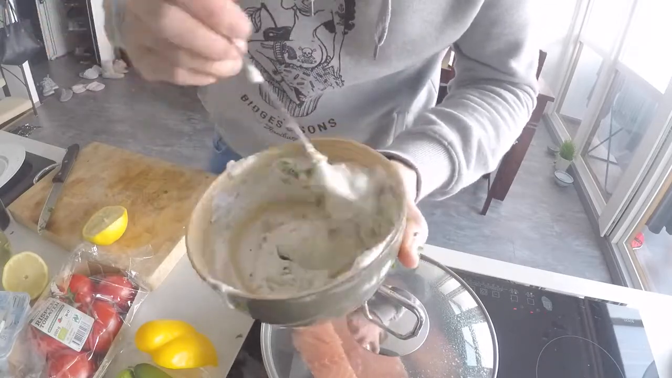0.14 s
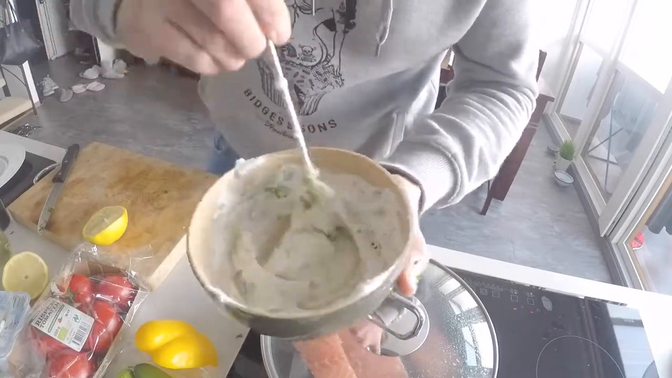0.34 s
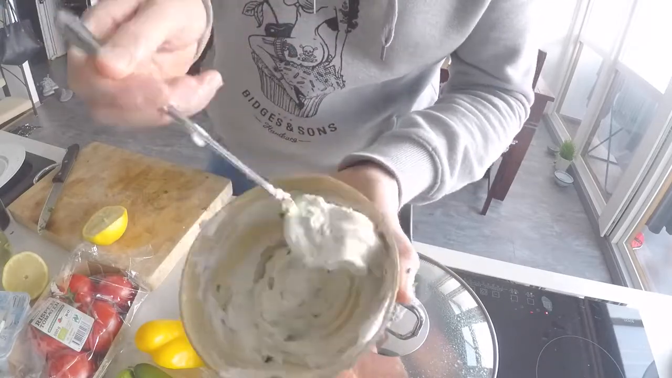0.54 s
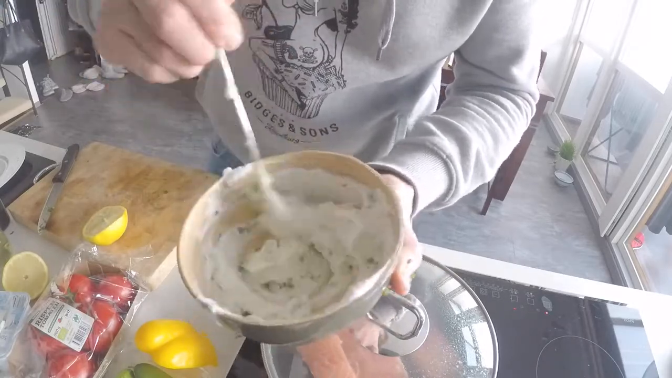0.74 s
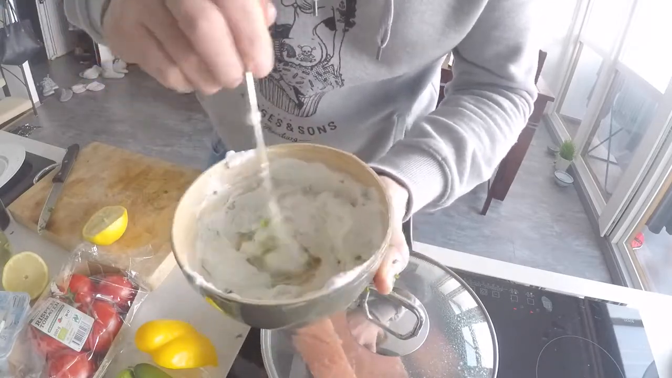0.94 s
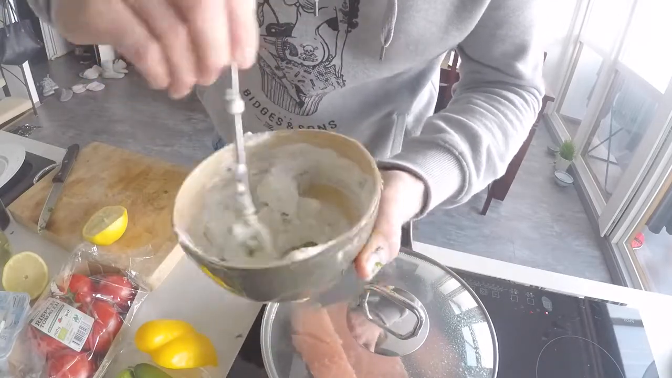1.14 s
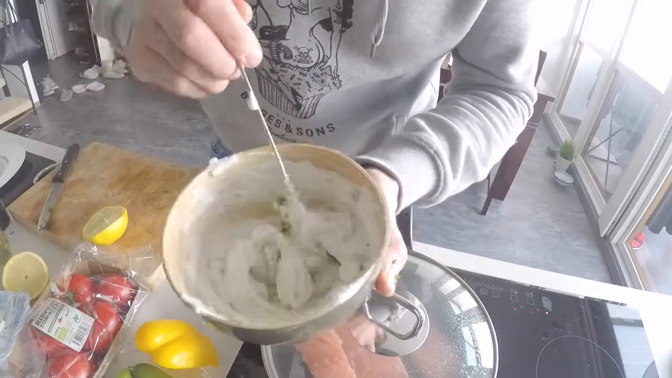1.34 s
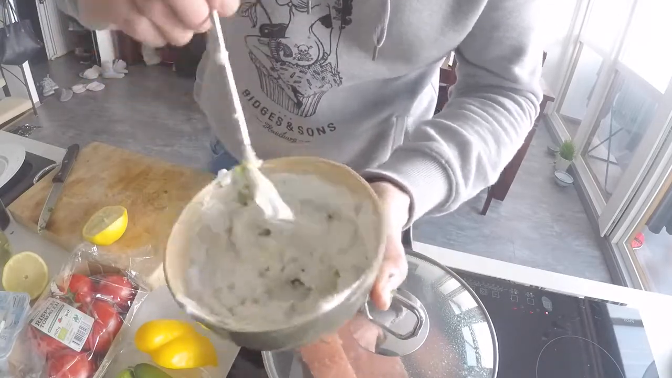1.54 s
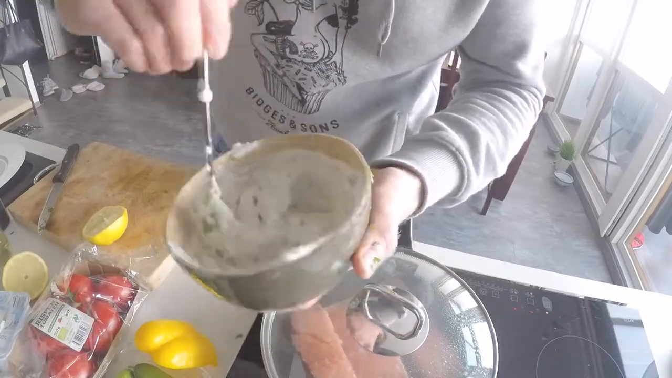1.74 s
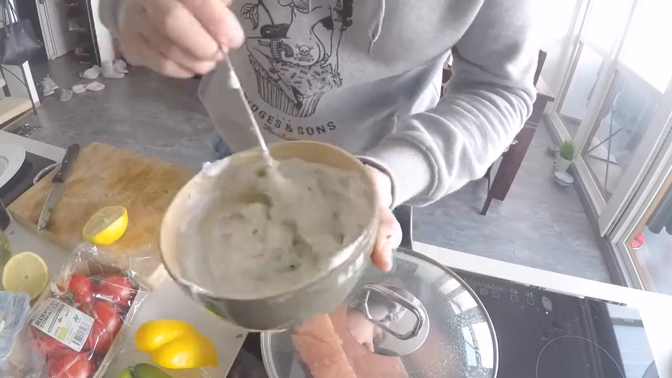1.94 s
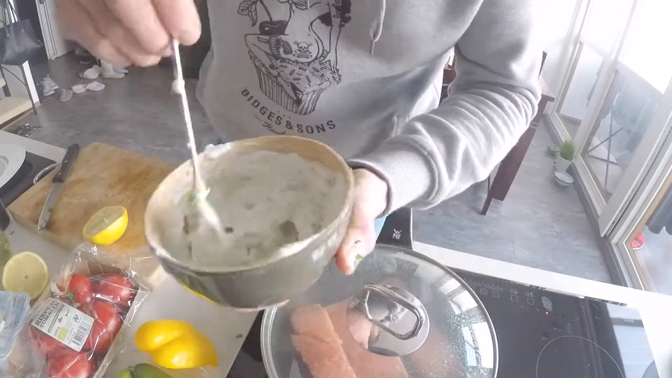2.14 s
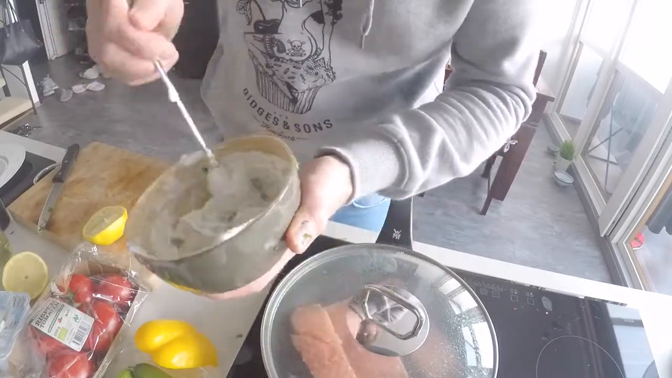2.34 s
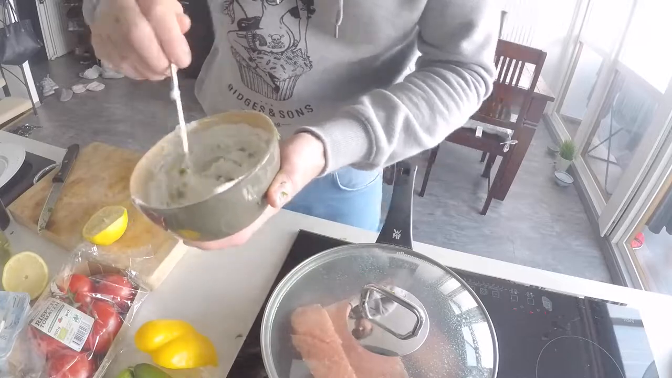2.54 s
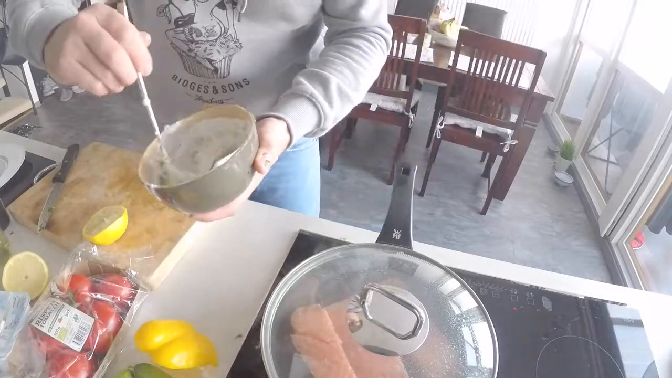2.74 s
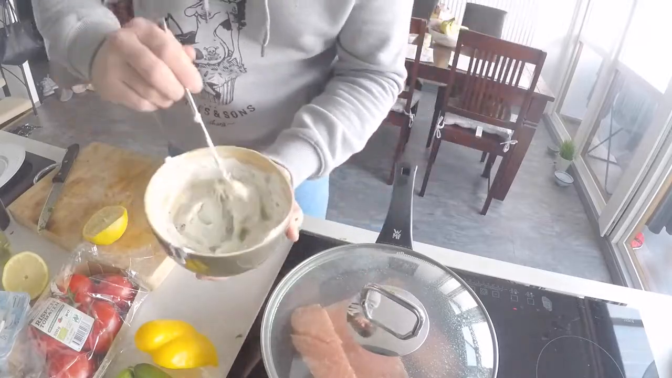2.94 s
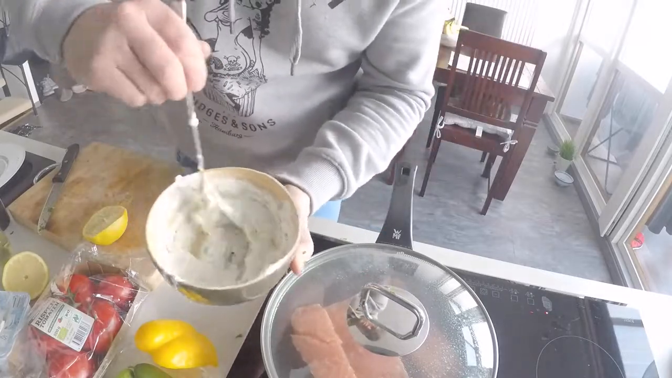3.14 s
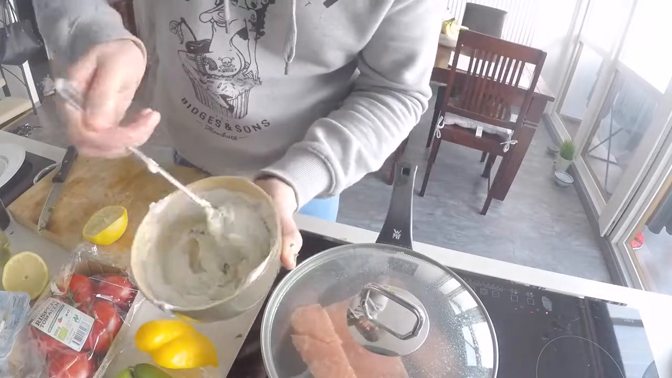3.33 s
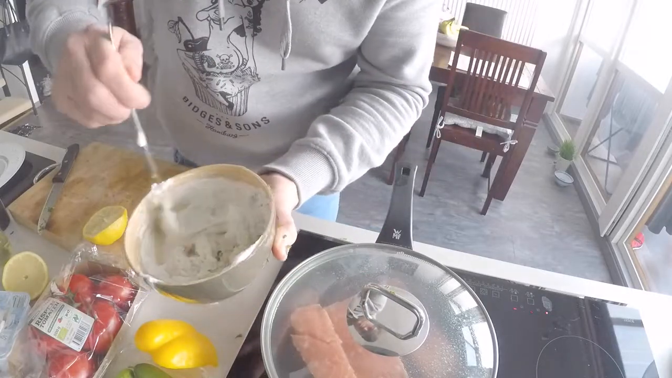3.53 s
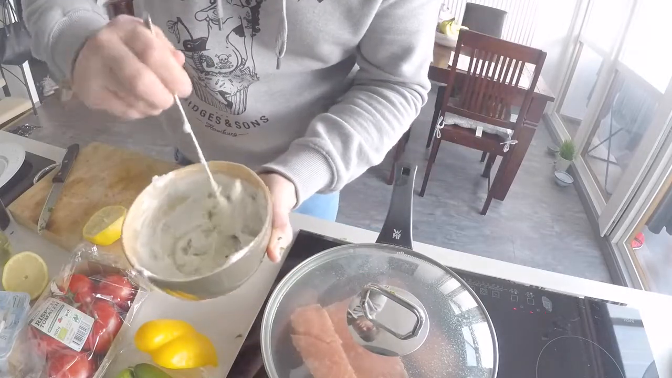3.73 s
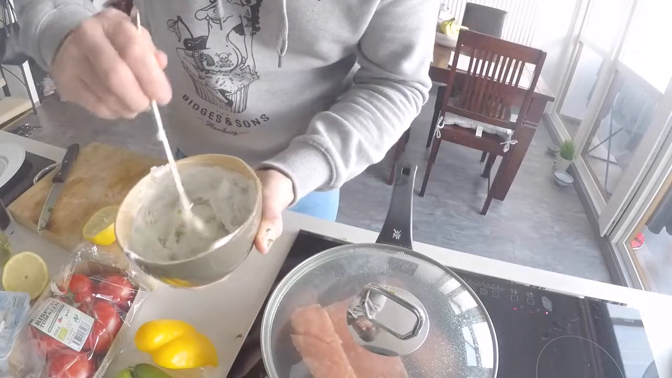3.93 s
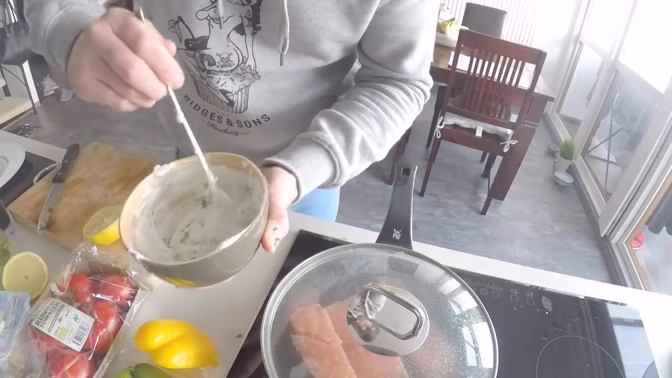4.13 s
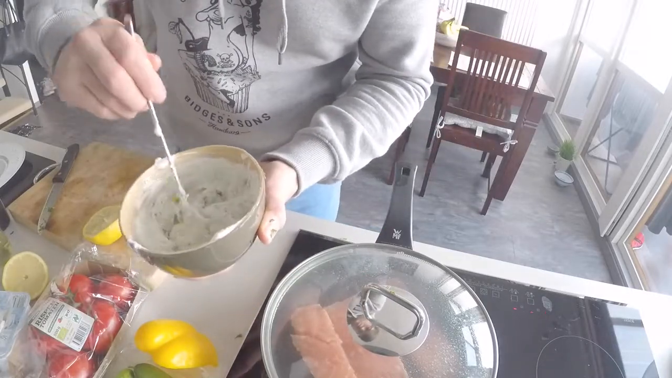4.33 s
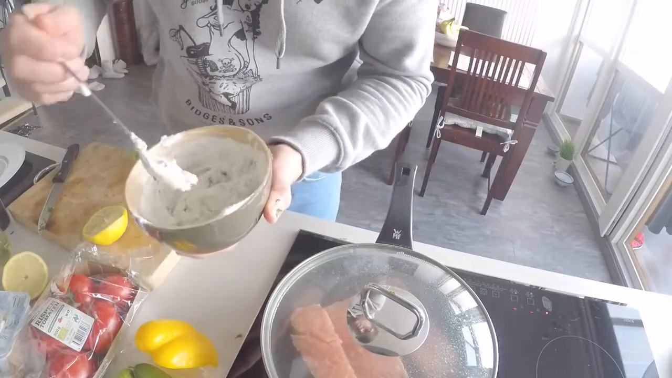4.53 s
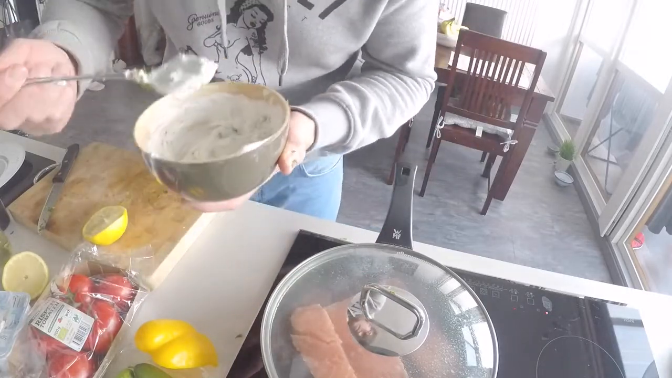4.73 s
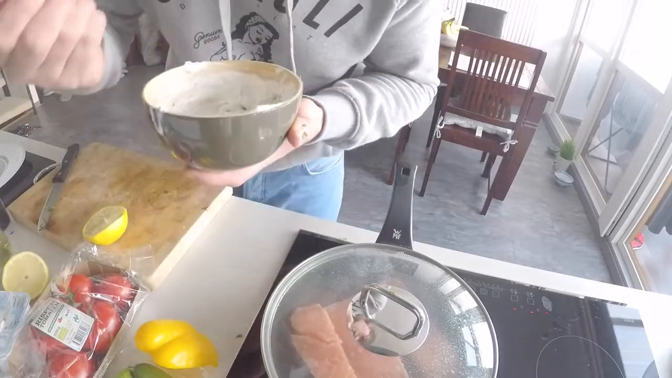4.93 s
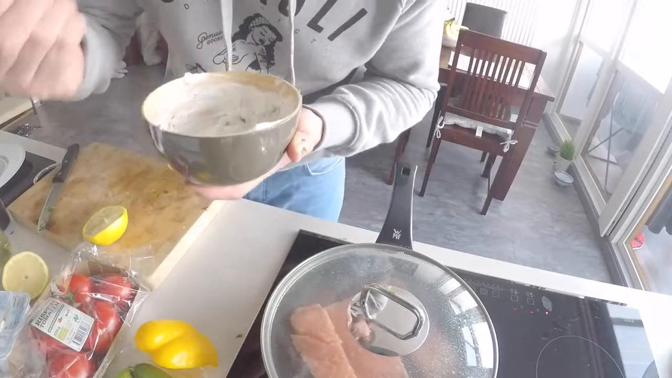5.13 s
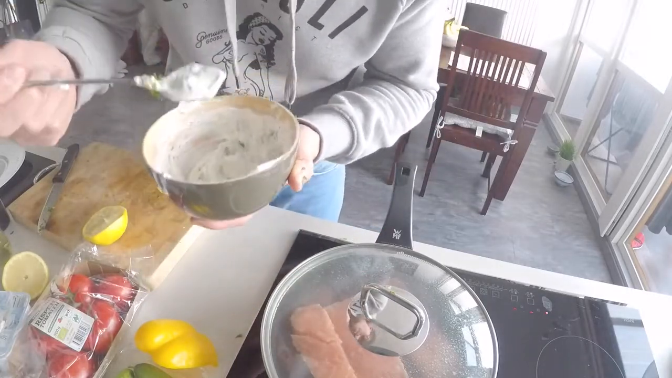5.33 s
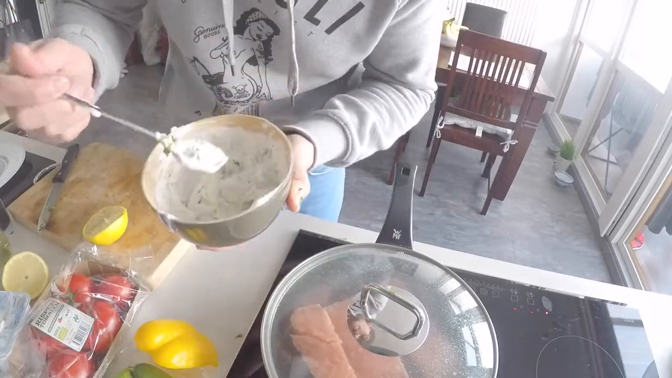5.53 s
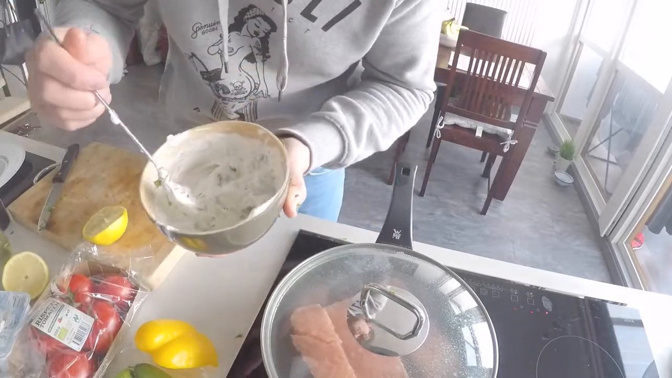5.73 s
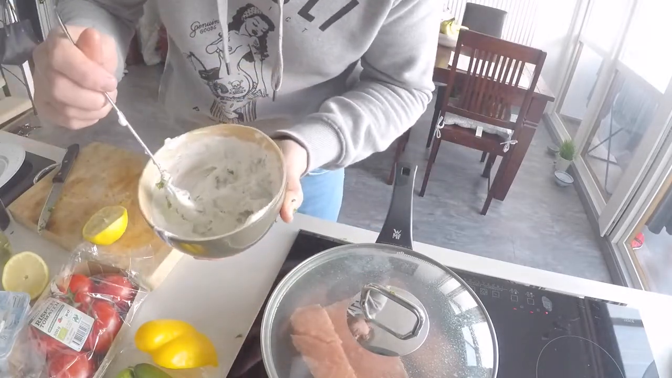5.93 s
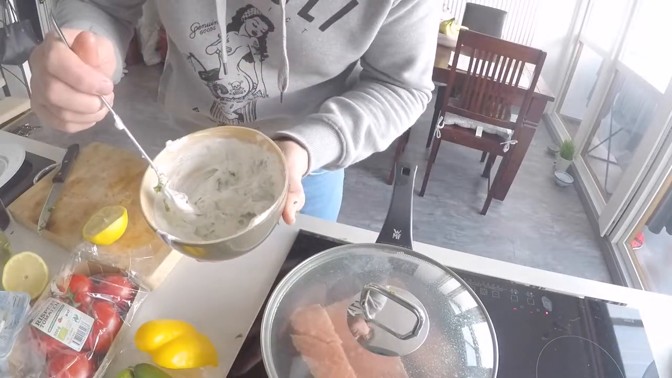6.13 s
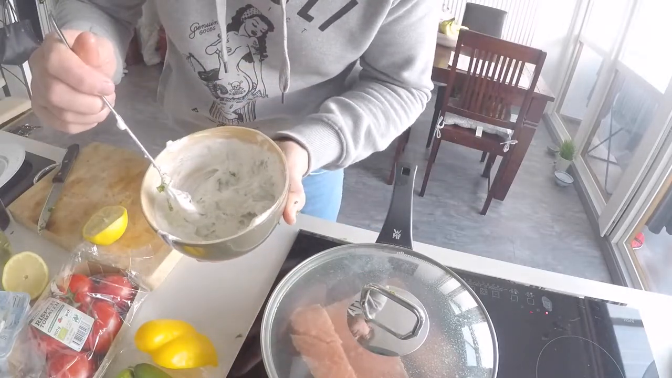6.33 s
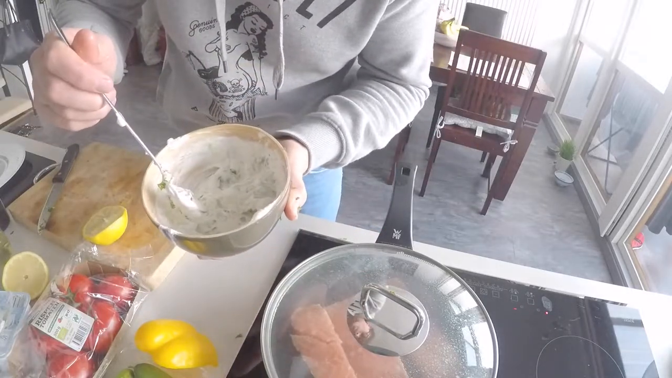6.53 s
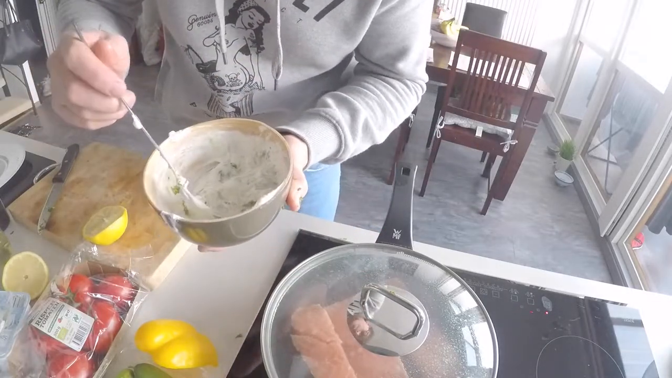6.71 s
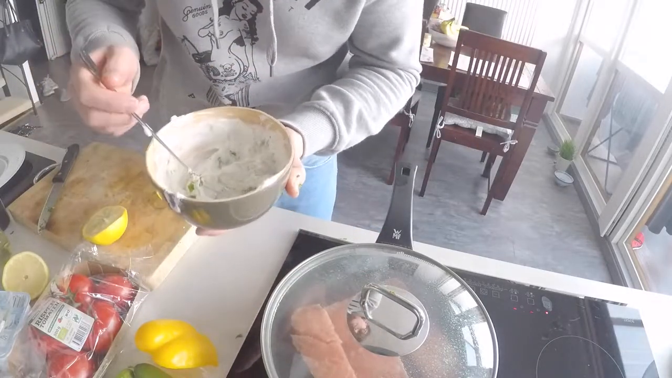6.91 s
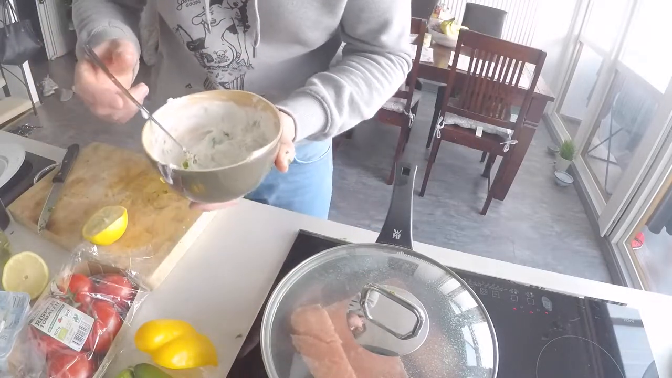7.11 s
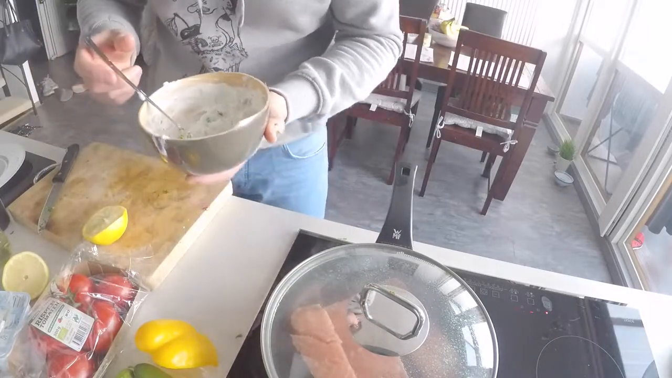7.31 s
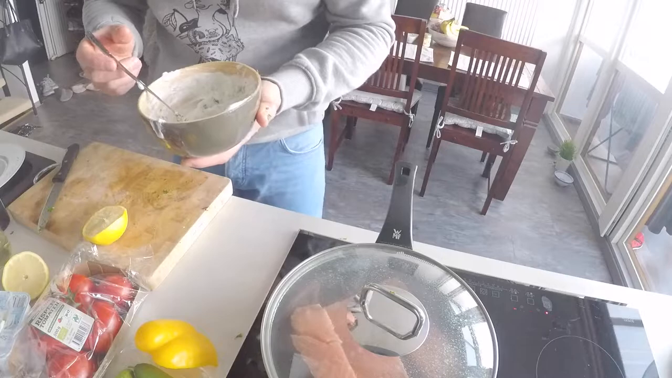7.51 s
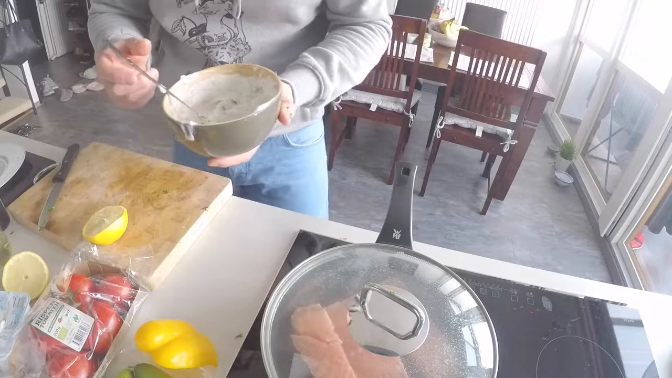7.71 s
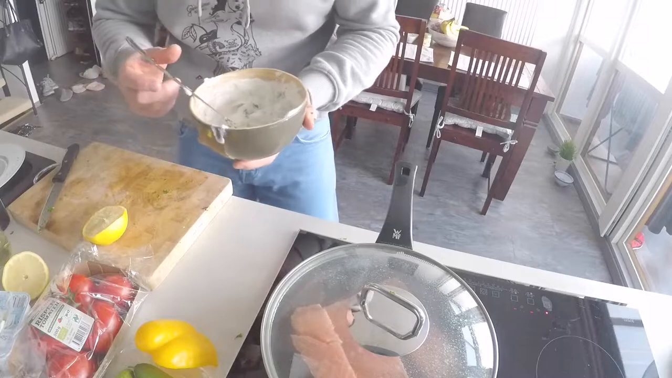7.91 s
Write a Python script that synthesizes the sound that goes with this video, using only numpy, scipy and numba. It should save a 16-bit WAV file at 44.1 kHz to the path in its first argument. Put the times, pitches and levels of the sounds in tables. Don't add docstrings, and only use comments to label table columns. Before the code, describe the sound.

Sped-up spoon knocks and scrapes in a bowl of thick sauce over frying sizzle, then a few natural-speed strokes and the covered pan sizzling alone.

```python
import sys
import numpy as np
from scipy import signal
from scipy.fft import rfft, irfft
from scipy.io import wavfile
from scipy.ndimage import uniform_filter1d
from numba import njit

SR = 44100
rng = np.random.default_rng(int(sys.argv[2]) if len(sys.argv) > 2 else 0)


def nominal_scale(level):
    x = np.asarray(level, float) / 20
    return 10 ** x


def master_out(mix):
    frames = np.transpose(np.atleast_2d(mix))
    ceiling = np.clip(frames, -1, 1)
    pcm = np.round(ceiling * 32767).astype(np.int16)
    wavfile.write(sys.argv[1], SR, pcm)


N = 355446
CHANGE_S, FAST = 3.4585, 3
TIME = np.arange(N) / SR
SPEED = np.where(TIME < CHANGE_S, FAST, 1.)


def unit(x):
    return x / np.sqrt(np.mean(x ** 2))


@njit
def band(x, hz, width):
    y, b, l = np.empty(len(x)), 0., 0.
    for i in range(len(x)):
        g, k = np.tan(np.pi * hz[i] / SR), width[i] / hz[i]
        v = (b + g * (x[i] - l)) / (1 + g * (g + k))
        b, l, y[i] = 2 * v - b, l + 2 * g * v, k * v
    return y


def body(x, modes):
    out = np.zeros(N)
    for hz, width, db in modes:
        centre = np.minimum(hz * SPEED, .4 * SR)
        out += nominal_scale(db) * np.sqrt(100 / width) * band(x, centre, width * SPEED)
    return out


def coloured(points):
    hz, db = np.transpose(points)
    shape = np.interp(np.log(np.fft.rfftfreq(N, 1 / SR) + 1), np.log(hz), db)
    return unit(irfft(rfft(rng.standard_normal(N)) * nominal_scale(shape), N))


def walk(rate):
    k = int(SR / rate)
    held = np.repeat(rng.standard_normal(N // k + 1), k)
    return unit(uniform_filter1d(uniform_filter1d(held, k), k)[:N])


def clicks(rate, spread_db):
    chance = rng.random((2, N))
    size = nominal_scale(-spread_db * np.log(chance[1] + 1e-6))
    return (chance[0] < rate / SR) * size * rng.choice([-1, 1], N)


def add(out, s, hz, cycles, db):
    u = np.arange(int(12 * cycles * SR / hz)) * hz / SR
    i = int(s * SR)
    swell = (u / cycles * np.exp(1 - u / cycles)) ** 2
    ring = (nominal_scale(db) * swell * np.sin(2 * np.pi * u))[:N - i]
    out[i:i + len(ring)] += ring


# f/Hz, level/dB per Hz
FAST_AIR = [(240, -16), (400, -2), (635, -4), (980, -2), (1700, -6.5), (2400, -5), (4300, -3.5),
            (5600, -7.5), (7800, -9), (8600, -9.5), (11000, -8.5), (13000, -5), (15000, -5), (17000, 1)]
AIR = [(240, -14), (400, -5), (720, -8), (1030, -2.5), (1500, -3), (2300, -10.5), (3300, -8), (4200, -5.5),
       (6400, -1.5), (8300, -7.5), (11600, -9.5), (12400, 2.5), (13800, -2), (15300, -7)]
FAST_AIR_DB, AIR_DB = -50.5, -51
# f/Hz, width/Hz, level/dB
LID = [(1060, 17, -4.5), (1492, 19, 0), (2830, 49, 7.5), (3730, 37, 2), (4260, 94, -3), (4200, 38, -5),
       (5500, 41, -17), (6430, 73, 2.5), (7500, 64, 6), (9500, 730, 11)]
# t/s, peak level/dB, f/Hz
SPITS = [(4.502, -35.5, 5290), (4.572, -36.5, 6360), (4.7723, -33, 6180), (5.0497, -32.5, 6370),
         (5.1887, -40, 6650), (5.334, -33.5, 5830), (5.434, -35, 6260), (5.47, -29, 5330),
         (5.801, -37, 4860), (6.116, -33, 6060), (6.347, -37, 6300), (6.383, -32, 6430), (6.436, -35, 4140),
         (6.582, -38, 6190), (6.8258, -33, 3570), (6.897, -32, 6270), (7.0265, -43, 6230),
         (7.157, -41, 4500), (7.2219, -32.5, 3570), (7.498, -36, 4840), (7.5333, -44, 4740),
         (7.604, -33, 3890), (7.7715, -37, 6380)]
# t/s, peak level/dB, f/Hz
DROPS = [(4.789, -49, 1090), (5.192, -53, 1710), (5.274, -41, 326), (5.537, -49, 1500), (5.688, -45, 1500),
         (5.736, -49.5, 1430), (6.15, -39.5, 330), (6.435, -52, 339), (6.698, -51, 1500),
         (6.944, -41.5, 356), (7.264, -45, 1210), (7.302, -42.5, 1460)]
LID_SHARE, FLICKER_DB, SWELL_DB = .75, .7, .9
SIZZLE_SWELL_DB, SIZZLE_HZ, SIZZLE_WIDTH_HZ = 2.2, 6500., 5000.
SPIT_DECAY_S, SPIT_SNAP_S, SPIT_SNAP_DB = .009, .0015, 1


def pan():
    fry = np.where(SPEED > 1, nominal_scale(FAST_AIR_DB) * coloured(FAST_AIR), nominal_scale(AIR_DB) * coloured(AIR))
    fry = fry + LID_SHARE * body(fry, LID)
    swell = nominal_scale(SIZZLE_SWELL_DB * np.where(SPEED > 1, walk(8.86), 0.67 * walk(6))) - 1
    fry = fry + swell * band(fry, np.full(N, SIZZLE_HZ), np.full(N, SIZZLE_WIDTH_HZ))
    kicks = nominal_scale(-56.5) / SPEED * np.abs(clicks(30 * SPEED, 2.3))
    colour = 4500 * SPEED
    for s, db, hz in SPITS:
        kicks[int(s * SR)] += nominal_scale(db - 13.0)
        colour[int(s * SR):] = hz
    puffs = np.zeros(N)
    for gain, decay_s in ((.8, SPIT_DECAY_S), (nominal_scale(SPIT_SNAP_DB), SPIT_SNAP_S)):
        puffs += gain * signal.lfilter([1], [1, -np.exp(-1 / (decay_s * SR))], kicks)
    steam = unit(band(rng.standard_normal(N), colour, 0.93 * colour)) + 0.5 * coloured(AIR)
    out = fry * nominal_scale(FLICKER_DB * walk(11) + SWELL_DB * walk(2.58)) + puffs * steam
    for s, db, hz in DROPS:
        add(out, s, hz, 0.51 * (hz / 330) ** 1.45, db)
    return out


# f/Hz, level/dB
HUM = [
    (25, -70.5),
    (100.5, -67),
]
# f/Hz, level/dB per Hz
RUMBLE = [(15, -6), (30, -2.5), (60, -4.5), (200, -11), (330, -10.5), (420, -17), (600, -19), (1500, -90)]
RUMBLE_DB, RUMBLE_SWELL_DB = -62, 1.0


def hum():
    turns = np.cumsum(SPEED) / SR
    lines = np.zeros(N)
    for hz, db in HUM:
        lines += nominal_scale(db + 3.1 * walk(9)) * np.sqrt(2) * np.sin(2 * np.pi * hz * turns)
    return lines + nominal_scale(RUMBLE_DB + RUMBLE_SWELL_DB * walk(3.3)) * coloured(RUMBLE)


# middle t/s, length/s, level/dB
GUSTS = [(0.1, 0.56, -40), (0.848, 0.18, -43.5), (1.257, 0.27, -55), (1.994, 0.44, -40), (3.07, 0.16, -37),
         (3.244, 0.095, -37), (4.4, 0.64, -60), (5.85, 0.11, -53), (6.586, 0.1, -43), (7.136, 0.53, -40.5),
         (7.473, 0.27, -27.5), (7.744, 0.34, -29)]
CALM_DB, DRAUGHT_HZ = -56, 3.76


def draught():
    size = np.full(N, nominal_scale(CALM_DB))
    for s, length, db in GUSTS:
        size += nominal_scale(db) * np.exp(-(2.0 * (TIME - s) / length) ** 2)
    hz = DRAUGHT_HZ * SPEED ** 0.71
    slow = band(band(rng.standard_normal(N), hz, 1.33 * hz), hz, 1.33 * hz)
    slow = band(slow, hz, 2 * hz)
    return size * unit(slow / np.sqrt(hz))


# t/s, length/ms, judder level/dB, grit level/dB
FAST_STROKES = [(0.0, 68, -53, -44), (0.066, 45, -53, -57), (0.26, 53, -50, -45), (0.348, 50, -45, -44),
                (0.448, 52, -53, -53), (0.484, 78, -55, -49), (0.737, 44.7, -42, -43.5),
                (0.825, 37, -42, -40.5), (0.913, 21, -41.5, -42.5), (0.948, 19, -55, -53),
                (0.987, 12, -44.5, -41.5), (1.055, 100, -53, -48.5), (1.199, 62, -53.5, -48),
                (1.266, 22, -54.5, -49), (1.455, 26, -45.5, -42), (1.76, 89, -49.5, -48),
                (1.982, 12.8, -35.5, -61), (2.031, 27, -52, -52), (2.115, 29, -45, -44.5),
                (2.241, 44, -49.5, -52), (2.359, 58, -55, -45.5), (2.57, 21, -50, -42),
                (2.613, 19.6, -45, -46), (2.657, 47, -48, -45.5), (2.791, 90, -56, -48),
                (3.036, 22, -51, -49.5), (3.072, 65, -57, -57), (3.148, 41, -41.5, -43.5),
                (3.238, 33, -52.5, -56), (3.292, 49, -55.5, -53.5)]
# t/s, length/ms, judder level/dB, grit level/dB, judder f/Hz
SLOW_STROKES = [(3.457, 70, -43.5, -78, 1060), (3.527, 39, -44, -37.5, 1140), (3.575, 47, -46.5, -52, 925),
                (3.641, 110, -41, -39, 716), (3.747, 30, -38.5, -69, 860), (3.795, 57, -47.5, -61, 930),
                (4.108, 19, -28, -44.5, 800), (4.13, 35, -36, -45, 770), (4.267, 53, -61, -45, 1180),
                (5.181, 33, -49, -55, 895), (5.68, 84, -59, -77, 1400), (6.12, 50, -58, -58, 1200),
                (7.24, 90, -53, -73, 1290), (7.45, 25, -52.5, -72, 1140)]
JUDDER_HZ, JUDDER_HZ_PER_DB, HEAVY_DB, GRIT_HZ, GRIT_HZ_PER_MS = 2200, 66, -46, 8550, 53
GRIT_OVER_JUDDER = 5.44


def stroke_rows():
    rows = []
    for s, ms, db, grit_db in FAST_STROKES:
        hz = JUDDER_HZ + JUDDER_HZ_PER_DB * max(HEAVY_DB - db, 0)
        rows.append((s, ms, db, hz, grit_db, GRIT_HZ + GRIT_HZ_PER_MS * ms))
    for s, ms, db, grit_db, hz in SLOW_STROKES:
        rows.append((s, ms, db, hz, grit_db, GRIT_OVER_JUDDER * hz))
    return rows


# f/Hz, width/Hz, level/dB
BOWL = [(339, 11, 0), (618, 11, -55), (748, 39, -5), (970, 310, -35), (1060, 39, -9.5), (1200, 22, -1.5),
        (1400, 46, -7)]
# f/Hz, width/Hz, level/dB
SPOON = [(2090, 150, -10.5), (2434, 150, -18), (3095, 120, -13.5), (3535, 96, -2), (4040, 150, -8),
         (4700, 300, -11.5), (6540, 1800, -12)]
PRESS_SHARE, PRESS_RISE_SHARE, GRIT_LEAD = 0.21, 0.12, 0.46
SLIP_DB, GRAIN_DB, JUDDER_ROUGH_DB, PATCHY_DB, GRIT_WANDER_OCT = 2.2, 2.4, 2.8, 3.5, .15
JUDDER_WIDTH, GRIT_WIDTH = 1.3, 0.63
SHANK_HZ, SHANK_WIDTH_HZ, SHANK_DB = 2160, 230, -1.5


def strokes():
    judder, grit = np.zeros(N), np.zeros(N)
    centre, rub_hz = np.full(N, 1000.), np.full(N, 10000.)
    for s, ms, judder_db, hz, grit_db, grit_hz in stroke_rows():
        start = int(s * SR)
        near = slice(max(int((s - .03) * SR), 0), int((s + ms / 1000 + .03) * SR))
        early = (s - TIME[near]) * 1000 / ms
        ease = np.maximum(TIME[near] - s - ms / 1000 + 0.0099, 0) / 0.009
        judder_wait = np.maximum(early + PRESS_SHARE, 0) / PRESS_RISE_SHARE
        grit_wait = np.maximum(early / GRIT_LEAD + PRESS_SHARE, 0) / PRESS_RISE_SHARE
        judder[near] += nominal_scale(judder_db) * np.exp(-judder_wait - ease)
        grit[near] += nominal_scale(grit_db) * np.exp(-grit_wait - ease)
        centre[start:], rub_hz[start:] = hz, grit_hz
    centre = centre * 2 ** (0.085 * walk(64))
    rub_hz = np.minimum(rub_hz * 2 ** (GRIT_WANDER_OCT * walk(50)), .4 * SR)

    slips = unit(clicks(400 * SPEED, SLIP_DB)) + 0.37 * rng.standard_normal(N)
    push = band(band(slips, centre, JUDDER_WIDTH * centre), centre, JUDDER_WIDTH * centre)
    push = band(push, centre, 2 * centre)
    wall = unit(0.86 * push + 0.65 * body(push, BOWL))

    grains = unit(clicks(1500 * SPEED, GRAIN_DB)) + rng.standard_normal(N)
    rub = band(band(grains, rub_hz, GRIT_WIDTH * rub_hz), rub_hz, GRIT_WIDTH * rub_hz)
    fine = band(grains, np.minimum(1.49 * rub_hz, 15000), 0.77 * rub_hz)
    shank_hz, shank_width = SHANK_HZ * SPEED, SHANK_WIDTH_HZ * SPEED
    shank = band(band(grains, shank_hz, shank_width), shank_hz, shank_width)
    rub, fine, shank = (part * nominal_scale(PATCHY_DB * walk(60)) for part in (rub, fine, shank))
    hiss = unit(rub + 0.64 * fine + 0.93 * body(rub, SPOON) + nominal_scale(SHANK_DB) * shank)
    return wall * judder * nominal_scale(JUDDER_ROUGH_DB * walk(140)) + hiss * grit * nominal_scale(1.8 * walk(90))


# t/s, peak level/dB, thud f/Hz, spoon tick level/dB (higher when the edge lands first)
KNOCKS = [(0.1991, -8.5, 2780, -18.5), (0.45, -13.5, 2600, -5), (0.6721, -5, 3200, -22.5),
          (0.831, -28, 2980, -14), (0.914, -24.5, 2200, -9), (0.9851, -26.5, 2410, -10),
          (1.0551, -17.5, 3150, -20), (1.1696, -11.5, 2520, -7), (1.38, -1.5, 3040, -20),
          (1.4548, -13, 2500, -8), (1.6484, -30, 2420, -13), (1.761, -7.5, 2740, -11.5),
          (1.985, -25, 2330, -14), (2.0347, -24, 2500, -11.5), (2.115, -40, 3090, -3),
          (2.2077, -14.5, 2750, -10.5), (2.3226, -9, 2960, -10.5), (2.506, -11.5, 2840, -10.5),
          (2.5722, -33, 2240, -8), (2.7608, -12.5, 2500, -19.5), (2.9666, -16.5, 2450, -11),
          (3.2429, -22.5, 3320, -9.5), (3.456, -12, 3180, -29), (4.11, -25.5, 930, -28),
          (4.344, -9.5, 930, -7.5), (0.110, -44, 2500, -20), (2.263, -28, 2720, -30),
          (2.862, -29, 2500, -28), (3.008, -32, 2500, -20), (3.119, -37, 1980, -16)]
RING_DB, RING_PER_TICK, THUD_CYCLES, CYCLES_PER_TICK_DB = -13.5, 0.55, 0.33, 0.0344
GRIP_DB, BOWL_RING_DB, SPOON_RING_DB, RADIATES_HZ = 3.5, -9.5, -6, 220


def knocks():
    out = np.zeros(N)
    grips = rng.standard_normal((len(KNOCKS), len(SPOON)))
    for (s, db, hz, tick_db), grip in zip(KNOCKS, grips):
        speed = SPEED[int(s * SR)]
        ring_db = db + RING_DB + RING_PER_TICK * tick_db
        thud_cycles = THUD_CYCLES - CYCLES_PER_TICK_DB * max(tick_db, -26)
        add(out, s + .0008, hz, thud_cycles, db - 0.5)
        add(out, s + 0.001, BOWL[0][0] * speed, .55, ring_db + 6.0)
        add(out, s + 0.00079, BOWL[1][0] * speed * 1.05, .8, ring_db - 13)
        add(out, s + 0.00057, 60 * speed, .4, ring_db - 14.0)
        for (spoon_hz, _, mode_db), free in zip(SPOON[:-1], grip):
            cycles = 2.2 * min(spoon_hz / 3550, 1)
            add(out, s + 0.00068, spoon_hz * speed, cycles, db + tick_db + mode_db + 6 + GRIP_DB * free)
    out = out + nominal_scale(BOWL_RING_DB) * body(out, BOWL) + nominal_scale(SPOON_RING_DB) * body(out, SPOON)
    thin = signal.sosfilt(signal.butter(2, RADIATES_HZ, "high", fs=SR, output="sos"), out)
    return np.where(SPEED > 1, out, thin)


ROOM_T60_S, ROOM_DB, ROOM_DULL_HZ = 0.41, -17, 2500


def room(x):
    t = np.arange(int(.6 * SR)) / SR
    dense = np.minimum(0.014 + 3.0 * t, 1)
    echoes = rng.standard_normal(len(t)) * (rng.random(len(t)) < dense) / np.sqrt(dense)
    echoes = echoes * nominal_scale(-60 * t / ROOM_T60_S) * (t > .004)
    tail = signal.sosfilt(signal.butter(1, ROOM_DULL_HZ, fs=SR, output="sos"), echoes)
    short = signal.decimate(tail, FAST)
    fast_wet = signal.fftconvolve(x * (SPEED > 1), short / np.sqrt(np.sum(short ** 2)))[:N]
    slow_wet = signal.fftconvolve(x * (SPEED == 1), tail / np.sqrt(np.sum(tail ** 2)))[:N]
    return nominal_scale(ROOM_DB) * (fast_wet * (SPEED > 1) + slow_wet)


FAST_TOP_HZ, TOP_HZ = 15850, 15350


def trim(x):
    hz, spectrum = np.fft.rfftfreq(N, 1 / SR), rfft(x)
    fast = irfft(spectrum * (hz < FAST_TOP_HZ), N)
    slow = irfft(spectrum * (hz < TOP_HZ), N)
    return np.where(SPEED > 1, fast, slow)


def scene():
    blows, rubs = knocks(), strokes()
    steady = trim(rubs + room(blows + rubs) + pan())
    return (blows + steady + hum() + draught())[None]


def band_limit(x):
    return signal.sosfilt(signal.butter(12, 16990, fs=SR, output="sos"), x)


def record(dry):
    mix = signal.sosfilt(signal.ellip(8, .2, 60, 16700, fs=SR, output="sos"), dry)
    return band_limit(mix)


dry = scene()
out = record(dry)
master_out(out)
```